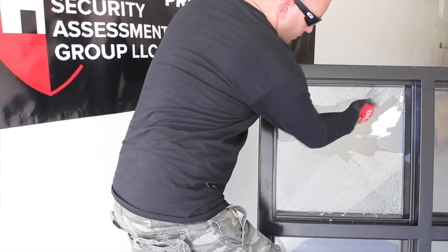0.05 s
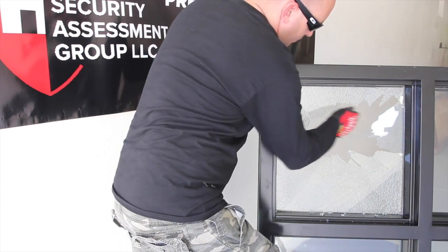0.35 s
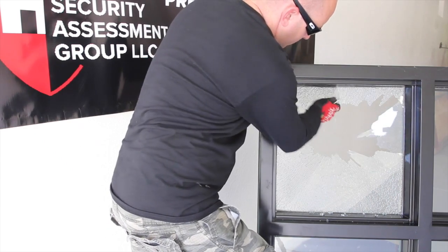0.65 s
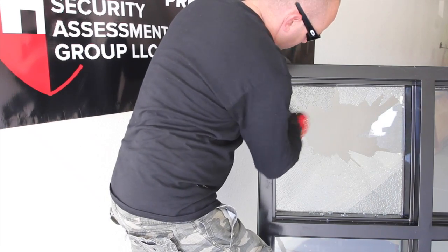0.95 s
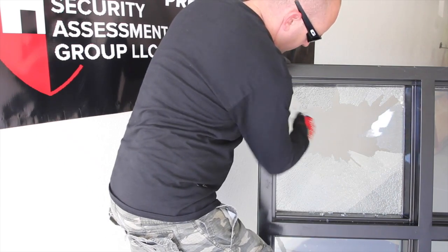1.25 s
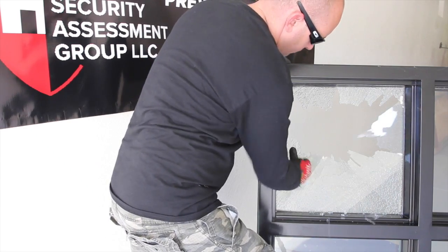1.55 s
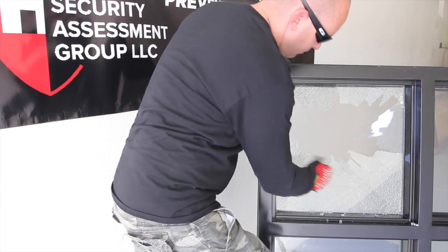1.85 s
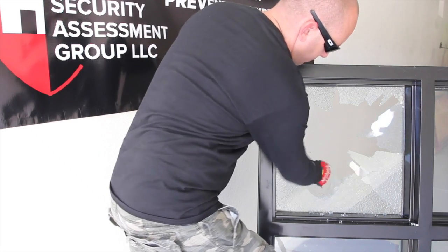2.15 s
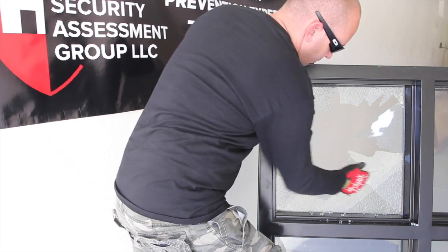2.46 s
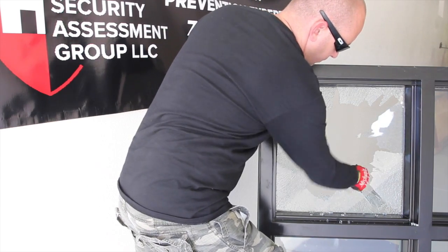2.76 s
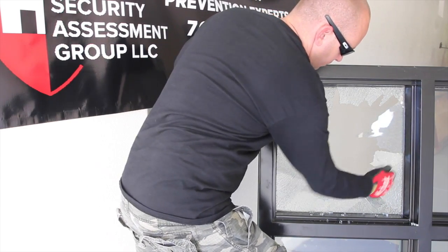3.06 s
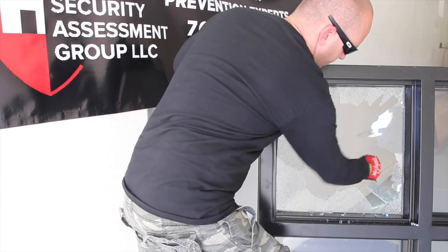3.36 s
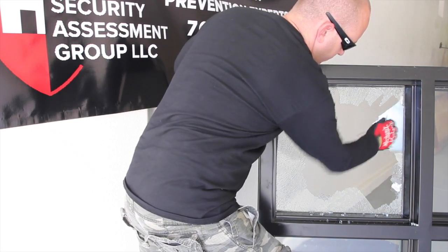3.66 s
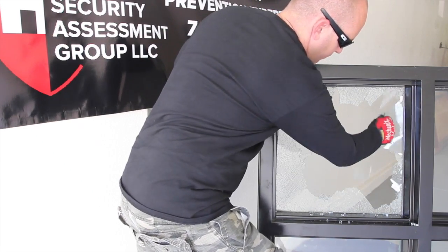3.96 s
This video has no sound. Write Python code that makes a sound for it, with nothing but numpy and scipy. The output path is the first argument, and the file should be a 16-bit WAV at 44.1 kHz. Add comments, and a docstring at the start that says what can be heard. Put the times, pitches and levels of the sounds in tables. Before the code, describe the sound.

A hand tool knocks into broken window glass with close thuds, crunches and ticks.

```python
"""A large echoing room, the microphone close to a cracked, filmed window pane, over a low hum and room air.
From the first instant a gloved hand drives a small tool into the glass. Each blow is a cluster: first
contact, the pane slamming in its frame, rebounds; then the broken glass crunches and ticks. From 1.5 s
the blows crowd together, around 3.3 s loose splinters jingle, and a last cluster lands just before 4 s.
Hard blows overload the microphone, which feeds the left channel only; the right carries faint hiss."""
import sys
import numpy as np
from scipy import signal
from scipy.fft import rfft, irfft
from scipy.io import wavfile

SR = 44100
rng = np.random.default_rng(int(sys.argv[2]) if len(sys.argv) > 2 else 0)


def file_out(sig):
    """Save sig as 16-bit WAV at sys.argv[1]."""
    # one column per channel
    cols = np.atleast_2d(sig).T
    # limit, then scale
    lim = np.clip(cols, -1, 1)
    pcm = np.round(lim * 32767).astype(np.int16)
    wavfile.write(sys.argv[1], SR, pcm)


N = 176400
LEAD = SR // 4   # samples before time zero, so the room is already ringing
TIME = np.arange(-LEAD, N) / SR


def from_db(db):
    """Decibels to gain."""
    return 10 ** (np.asarray(db) / 20)


def at_hz(points, hz):
    """Read a table on a log-frequency axis."""
    freqs, values = np.transpose(points)
    return np.interp(np.log(np.maximum(hz, 1)), np.log(freqs), values)


def unit_energy(x):
    """Scale a response so that it passes white noise at the same level."""
    return x / np.sqrt(np.sum(x ** 2) + 1e-20)


def through(x, response):
    """Play a signal through an impulse response."""
    return signal.fftconvolve(x, response)[:len(x)]


def colour(x, spectrum, size=4096):
    """Causal (minimum-phase) filter with the given spectral shape."""
    gain = from_db(at_hz(spectrum, np.arange(size // 2 + 1) * SR / size))
    cepstrum = irfft(np.log(gain))
    cepstrum[1:size // 2] *= 2
    cepstrum[size // 2 + 1:] = 0
    response = irfft(np.exp(rfft(cepstrum)))
    return through(x, unit_energy(response))


def grains(per_s, spread_db):
    """Random clicks of uneven size; rms 1."""
    count = len(TIME)
    sizes = from_db(spread_db * np.minimum(rng.exponential(1, count), 4))
    signs = rng.choice([-1, 1], count)
    clicks = sizes * signs * (rng.random(count) < per_s / SR)
    return clicks / np.std(clicks)


def bursts(rows, attack_s=0.00075):
    """Envelope of (start s, dB, decay s) events: quick attack, exponential fall, adding in power."""
    power = np.zeros(len(TIME))
    for start, db, decay in rows:
        span = slice(*np.searchsorted(TIME, [start, start + 6 * decay]))
        age = TIME[span] - start
        power[span] += (from_db(db) * (1 - np.exp(-age / attack_s)) * np.exp(-age / decay)) ** 2
    return np.sqrt(power)


def ring(age, hz, t60):
    """A dying sine that starts at age 0."""
    age = np.maximum(age, 0)
    return np.sin(2 * np.pi * hz * age) * from_db(-60 * age / t60)


# The idle right channel. Each row: frequency in Hz, relative level in dB.
IDLE_SPECTRUM = [(15, 3), (50, 6), (200, 6), (1500, 2), (15000, 1.5)]
# Room air at the microphone. Each row: frequency in Hz, relative level in dB.
AIR_SPECTRUM = [(30, -10), (150, -2), (500, 1), (2000, 0), (6000, -12), (15000, -17)]


def hiss(spectrum, db):
    """Steady coloured noise: the air of the room or an idle input."""
    return from_db(db) * colour(rng.standard_normal(len(TIME)), spectrum)


# Hum on the microphone's side. Each row: frequency in Hz, level in dB.
HUM_TONES = [(118.4, -52), (177.6, -49.5)]


def hum():
    """Two steady low tones lie under the room air."""
    return sum(from_db(db) * np.sin(2 * np.pi * hz * TIME) for hz, db in HUM_TONES)


# How long the large room rings. Each row: frequency in Hz, time to fall 60 dB in seconds.
ROOM_DECAY = [(100, 0.52), (400, 0.9), (1000, 1.056), (2500, 0.96), (5000, 0.74), (8000, 0.39),
              (14000, 0.76)]


def room(x, paths=7, path_change_s=0.035, build_s=0.005):
    """Sound leaves ever different parts of the pane, so several diffuse echo patterns take turns."""
    age = np.arange(SR) / SR
    edges_hz = np.geomspace(30, 18000, 15)
    white = rng.standard_normal((2, paths, len(age)))
    tails, echo = 0, 0
    for k, (low, high) in enumerate(zip(edges_hz, edges_hz[1:])):
        band = signal.sosfilt(signal.butter(2, [low, high], "band", fs=SR, output="sos"), white[k % 2])
        t60 = at_hz(ROOM_DECAY, np.sqrt(low * high))
        tails = tails + band * from_db(-60 * age / t60)
    tails = tails * (1 - np.exp(-age / build_s))
    for k, tail in enumerate(tails):
        turns_away = np.abs((TIME / path_change_s + k) % paths - paths / 2)
        crossfade = np.cos(np.pi / 2 * np.minimum(turns_away, 1))
        echo = echo + through(x * crossfade, unit_energy(tail))
    return echo


# Loose splinters in the window. Each row: start in seconds, pitch in Hz, level in dB.
JINGLES = [(.2, 10140, -34), (.268, 12100, -47), (2.79, 6800, -41), (3.235, 8000, -30), (3.25, 9200, -39),
           (3.265, 10220, -39), (3.307, 11100, -43), (3.36, 6750, -37)]
# The ring of one splinter. Each row: ratio to its pitch, relative level in dB.
JINGLE_PARTIALS = [(1, 0), (.86, -7), (1.13, -11)]


def splinters(rattle_s=0.033, t60=0.02):
    """Loose splinters rattle briefly, each ringing on a few high partials."""
    age, out = np.arange(SR // 5) / SR, 0
    touches = grains(per_s=450, spread_db=8.0)
    for start, hz, db in JINGLES:
        ping = sum(from_db(level) * ring(age, hz * ratio, t60) for ratio, level in JINGLE_PARTIALS)
        rattle = bursts([(start, db, rattle_s)]) * touches
        out = out + through(rattle, unit_energy(ping))
    return out


def crack_decay(snap_db):
    """Decay time in seconds: stronger cracks run for longer."""
    return 0.013 * from_db(0.3 * snap_db)


# Cracks running through the glass. Each row: start in seconds, snap level in dB, thud level in dB.
RUNNING_CRACKS = [(0.249, -29, -4.5), (0.314, -19.5, -13), (0.523, -23.5, -25), (0.544, -16.5, -9.5),
                  (.594, -15, -21), (0.613, -14.5, -9), (.688, -18.5, -11.5), (1.348, -20, -29),
                  (1.404, -41, -23), (1.476, -30, -35), (1.504, -35.5, -30), (1.524, -19.5, -14),
                  (1.562, -6.5, -15), (1.638, -1, -8), (1.759, -13, -3.5), (1.861, -8.5, -10.5),
                  (2.049, -10, -12), (2.162, -20, -26), (2.398, -22.5, -28), (2.433, -6, 0),
                  (2.617, -8.5, -4), (2.789, -14, -32), (2.812, -26, -39), (2.848, -17, -36),
                  (2.961, -20.5, -53), (2.990, -17, -10), (3.167, -10.5, -0.5), (3.237, -23, -29),
                  (3.261, -13.5, -16), (3.302, -18, -13), (3.538, -20.5, -38), (3.59, -19.5, -16),
                  (3.653, -11, -13)]
# A lone crack at the microphone. Each row: frequency in Hz, relative level in dB.
SNAP_SPECTRUM = [(200, 3), (1000, -8), (2600, -3), (5300, -1.5), (7500, -14), (10000, -25.5), (15000, -44)]


def snaps():
    """A running crack is a few milliseconds of bright clicks."""
    running = bursts([(start, db, crack_decay(db)) for start, db, _ in RUNNING_CRACKS])
    return colour(running * grains(per_s=2700, spread_db=1.0), SNAP_SPECTRUM)


# Knocks of tool, pane and frame, driving every source from here on. Each row: start in seconds,
# thud level in dB, crunch level in dB, decay time in seconds, pitch of the struck spot in Hz.
TOOL_KNOCKS = [ (-.04, 5.5, -3.5, 0.015, 658), (.02, -2.5, -7.5, 0.021, 910),
               (.115, -6.5, -11.5, 0.0099, 636), (.628, -7.5, -14, 0.0063, 694),
               (.636, -10, -15, .016, 588), (0.784, -15, -23, 0.015, 1520),
               (1.059, -8.5, -5.5, 0.015, 1580), (1.069, 1.5, -43, 0.0072, 630),
               (1.104, -3, -32, 0.011, 667), (1.119, -1, -8.5, 0.034, 852), (1.532, -5, -11, 0.038, 876),
               (1.559, 5, -0.5, 0.013, 628), (1.588, 0, -16, 0.016, 664), (1.638, 4.5, -5, 0.0037, 1079),
               (1.718, -2, -30, 0.023, 651), (1.755, -0.5, 2, 0.0057, 2690),
               (1.858, -11, -34, 0.0043, 1090), (1.955, -12, -39, 0.0066, 860),
               (2.027, -1, -12, 0.017, 1257), (2.047, 2.5, 5, 0.0067, 631), (2.096, 0, -6.5, 0.01, 1535),
               (2.121, -3, -27, 0.0086, 880), (2.264, -7.5, -35, 0.002, 1500), (2.429, 4, -2, 0.0092, 2408),
               (2.469, 3, -1.5, 0.013, 1003), (2.518, -0.5, -4, 0.0093, 1606),
               (2.613, -0.5, -0.5, 0.0067, 645), (2.643, 1, -6, 0.0039, 788),
               (2.994, -1.5, -7.5, 0.018, 624), (3.012, 1.5, -5, 0.0079, 613), (3.039, 2, -4, 0.012, 1136),
               (3.101, -13, -9.5, 0.0087, 1096), (3.165, -6.5, -11.5, 0.013, 900),
               (3.624, -11.5, -14.5, 0.012, 940), (3.66, 1, -34, 0.02, 1055), (3.685, -3, -5.5, 0.016, 605),
               (3.716, -1.5, -32, 0.016, 780), (3.757, 6, -12.5, 0.011, 682),
               (3.853, 3.5, -23, 0.0033, 623), (3.928, -1.5, -38, 0.0023, 597)]
# Fine splintering, heard only close up. Each row: frequency in Hz, relative level in dB.
SIZZLE_SPECTRUM = [(2000, -25), (6000, 7), (9000, -3), (15000, -7.5)]


def sizzle(level_db=-23, decay_s=0.031):
    """Tiny chips break off along the cracks while the pane is bent."""
    bending = bursts([(start, db + level_db, decay_s) for start, _, db, _, _ in TOOL_KNOCKS])
    return colour(bending * grains(per_s=2800, spread_db=3.5), SIZZLE_SPECTRUM)


# Breaking glass at the microphone. Each row: frequency in Hz, relative level in dB.
CRUNCH_SPECTRUM = [(100, -47), (600, -6.5), (1500, 1.5), (2600, 8.5), (3600, 3), (5300, -1), (7500, -14.5),
                   (10000, -21), (15000, -32.5)]


def glass_crunch(settle_db=-21, settle_s=0.066):
    """Dense fractures under each knock, then sparse ticks as the fragments settle."""
    knocks = [(start, db, decay) for start, _, db, decay, _ in TOOL_KNOCKS]
    fractures = bursts(knocks) * grains(per_s=2700, spread_db=-1.0)
    settling = bursts([(start, db + settle_db, settle_s) for start, db, _ in knocks])
    ticks = settling * grains(per_s=240, spread_db=11.5)
    return colour(fractures + ticks, CRUNCH_SPECTRUM)


# Hard blows bend the pane and shake the frame. Each row: start in seconds, level in dB, pitch in Hz.
FRAME_THUMPS = [(.01, -6, 361), (.632, -11.5, 444), (1.119, -13, 151.4), (1.589, -34, 265),
                (2.121, -13, 203), (3.04, -3, 436), (3.758, -8, 306), (3.80, -9, 397), (3.854, -4, 427.5)]


def hollow_knocks(spot_db=6, spot_t60=0.056, thump_t60=0.17, rise_s=0.0043):
    """The struck spot gives a short pitched knock; hard blows add a lower thump of the frame."""
    age, out = np.arange(SR // 3) / SR, np.zeros(len(TIME))
    spots = [(start, db + spot_db, hz, spot_t60) for start, db, _, _, hz in TOOL_KNOCKS]
    thumps = [(start, db, hz, thump_t60) for start, db, hz in FRAME_THUMPS]
    for start, db, hz, t60 in spots + thumps:
        first = np.searchsorted(TIME, start)
        knock = from_db(db) * ring(age, hz, t60) * (1 - np.exp(-age / rise_s))
        out[first:first + len(age)] += knock[:len(out) - first]
    return out


# The pane's thud at the microphone. Each row: frequency in Hz, relative level in dB.
THUD_SPECTRUM = [(30, -39.5), (100, -24), (230, -11.5), (380, -1.5), (620, 1), (1100, 2), (1600, -0.5),
                 (2600, -8.5), (3600, -23), (6000, -20), (15000, -90.5)]
# Ringing of pane and frame. Each row: frequency in Hz, level in dB, time to fall 60 dB in seconds.
WINDOW_MODES = [(360, -22.5, 0.6), (426, -21.5, 0.31), (631, -25.5, 0.068), (860, -33.5, 0.037)]


def pane():
    """Every knock and crack makes the pane chatter in its frame and sets its modes ringing."""
    knocks = [(start, db, decay) for start, db, _, decay, _ in TOOL_KNOCKS]
    cracks = [(start, db, crack_decay(snap_db)) for start, snap_db, db in RUNNING_CRACKS]
    chatter = bursts(knocks + cracks) * grains(per_s=5000, spread_db=2.0)
    age = np.arange(SR // 2) / SR
    modes = sum(from_db(db) * unit_energy(ring(age, hz, t60)) for hz, db, t60 in WINDOW_MODES)
    return colour(chatter, THUD_SPECTRUM) + through(chatter, modes)


def scene():
    """On the left, the microphone: the window close by, the room behind. On the right, idle hiss."""
    # Each pair: a sound, the level of its room echo in dB against the direct sound.
    layers = [(pane(), 2.5), (hollow_knocks(), -4.5), (glass_crunch(), 1.5),
              (snaps(), -7), (splinters(), -12)]
    direct = sum(sound for sound, _ in layers) + sizzle()
    echo = room(sum(from_db(db) * sound for sound, db in layers))
    left = direct + echo + hum() + hiss(AIR_SPECTRUM, db=-38)
    right = hiss(IDLE_SPECTRUM, db=-61.5)
    return np.array([left, right])[:, LEAD:]


def record(dry, cutoff_hz=15900):
    """The microphone input overloads with flat tops; the highest treble is cut."""
    lowpass = signal.ellip(10, 0.1, 70, cutoff_hz, fs=SR, output="sos")
    return signal.sosfilt(lowpass, np.clip(dry, -1, 1))


dry = scene()
out = record(dry)
file_out(out)
```